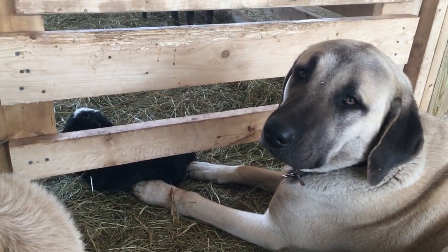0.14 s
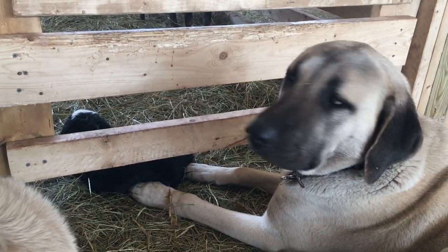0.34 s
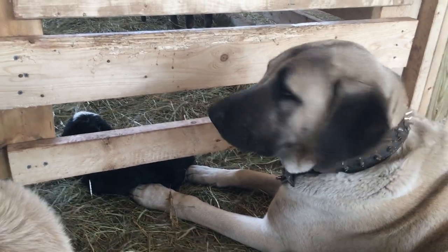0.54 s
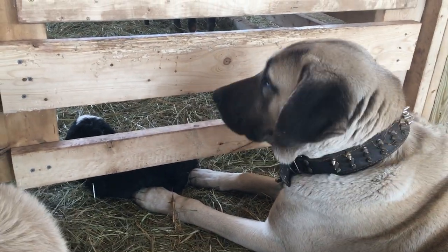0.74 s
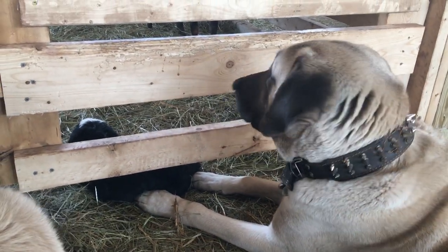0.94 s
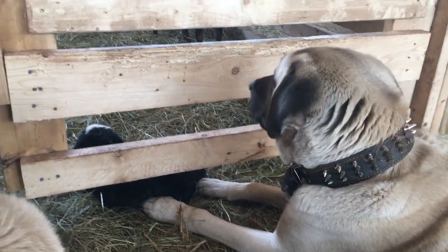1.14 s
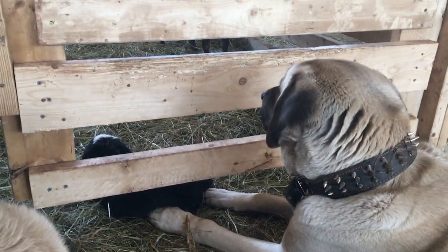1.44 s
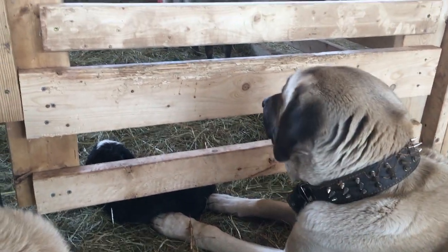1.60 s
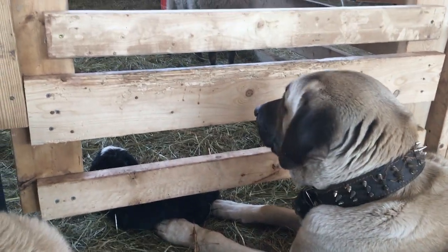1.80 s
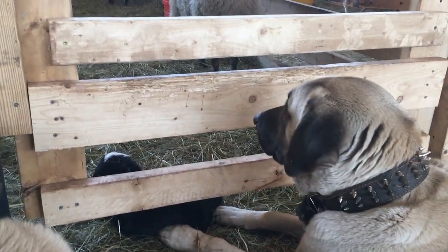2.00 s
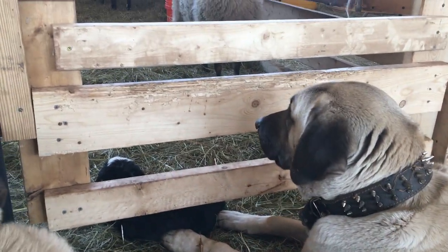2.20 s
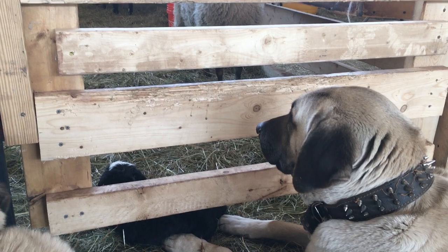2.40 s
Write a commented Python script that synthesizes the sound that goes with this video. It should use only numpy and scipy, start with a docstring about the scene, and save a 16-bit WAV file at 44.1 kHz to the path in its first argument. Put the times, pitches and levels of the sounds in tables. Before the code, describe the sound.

A lamb bleats once in a wooden barn, starting closed-mouthed, opening, then sagging in pitch.

```python
"""A lamb bleats once in a wooden barn, a few metres away: mouth closed, then open, the pitch sagging at the end.
The voice is a stack of overtones and pulsed breath through a changing throat, led in by hiss from the nose.
Near planks answer with dense noise echoes and the barn with a tail that dies at its own speed per frequency.
Boards knock far off as coloured noise bursts, small things tick close by as brief rings, straw rustles
in lumps of noise, and a low rumble with faint hiss fills the air."""
import sys
import numpy as np
from scipy import signal
from scipy.fft import rfft, irfft, next_fast_len
from scipy.io import wavfile
from scipy.ndimage import uniform_filter1d, map_coordinates

SR = 44100
rng = np.random.default_rng(int(sys.argv[2]) if len(sys.argv) > 2 else 0)


def voltage_ratio(level):
    """Linear amplitude factor for a level in decibels (scalar or array-like)."""
    return 10 ** (np.asarray(level, float) / 20)


def generate_wav(signal):
    """Clip the signal to [-1, 1] and save it as 16-bit WAV at the path in sys.argv[1]."""
    frames = np.transpose(np.atleast_2d(signal))
    scaled = np.clip(frames, -1, 1) * 32767
    pcm = np.round(scaled).astype(np.int16)
    wavfile.write(sys.argv[1], SR, pcm)


N = 112454
VOICE_N = SR  # the voice is made in one second

# Colour of the open throat, for overtones and breath. Each row: frequency in Hz, level in dB.
OPEN_THROAT = [(800, -7), (1200, -4), (1650, 0), (2000, -7), (2550, -4), (2820, -10), (3000, -24),
               (3230, -26), (3420, -10), (3600, -7), (4000, -11), (4400, -8), (5000, -15), (5550, -9),
               (6100, -10), (7000, -17), (7700, -26), (9000, -25), (10300, -31), (11700, -28), (12600, -33),
               (13500, -46), (16000, -39)]


def unit(x):
    """Scale to rms 1."""
    return x / np.sqrt(np.mean(x ** 2) + 1e-20)


def along(points, hz):
    """Read (Hz, value) points on a log frequency axis."""
    f, v = np.transpose(points)
    return np.interp(np.log(hz + 1), np.log(f + 1), v)


def level_over_time(points, t):
    """Read (seconds, dB) points over time, at -120 dB outside them."""
    s, db = np.transpose(points)
    return np.interp(t, s, db, left=-120, right=-120)


def wobble(rate, count, size=N):
    """Random curves: straight lines between normal random knots, rate knots a second."""
    knots = rng.standard_normal((count, int(size * rate / SR) + 4))
    place = np.arange(size) * rate / SR
    return np.array([map_coordinates(k, [place], order=1) for k in knots])


def coloured(x, points):
    """Filter x to the (Hz, dB) colour."""
    m = next_fast_len(len(x) + 8192)
    gain = voltage_ratio(along(points, np.fft.rfftfreq(m, 1 / SR)))
    return irfft(rfft(x, m) * gain, m)[:len(x)]


def overtones(t, hz, phase, mouth, low_db, mid_db, treble_db):
    """Vocal folds: a fundamental and flickering overtones, shaped by a throat that goes from closed to open."""
    # Colour of the throat behind a closed mouth. Each row: frequency in Hz, level in dB.
    closed_throat = [(800, -3), (1200, 1.5), (1600, -6), (1900, -4), (2250, -1.5), (2700, -19), (3100, -28),
                     (3800, -13), (4600, 0.5), (5400, -2.5), (6200, -12.5), (7600, -22), (16000, -48)]
    treble_hz = 3030  # the middle overtones end and the treble starts here
    shimmer_db, wander_rad, spread_rad = 3.5, 0.055, 0.16  # flicker, phase wander, pulse smear
    shut_treble_db, voiced_from_s = -7.5, 0.27  # voiced treble held down until this time

    k = np.arange(2, 37)[:, None]
    overtone_hz = k * hz
    throat = voltage_ratio((1 - mouth) * along(closed_throat, overtone_hz) + mouth * along(OPEN_THROAT, overtone_hz))
    flicker = voltage_ratio(shimmer_db * wobble(35, len(k), VOICE_N))
    wander = wander_rad * k * wobble(60, len(k), VOICE_N)
    wave = flicker * np.cos(k * phase + spread_rad * k ** 2 + wander)

    held_down = np.clip((voiced_from_s - t) / 0.03 + 1, 0, 1)
    tone = voltage_ratio(low_db) * np.cos(phase)
    for share, db in ((overtone_hz < treble_hz, mid_db),
                      (overtone_hz >= treble_hz, treble_db + shut_treble_db * held_down)):
        weight = throat * share
        tone = tone + voltage_ratio(db) * (weight * wave).sum(0) / np.sqrt((weight ** 2).sum(0))
    return np.sqrt(2) * tone


def breath(hz, phase, mouth, mid_db):
    """Breath noise pulsed once a cycle through the open throat, stronger while the pitch slides."""
    # Colour of the breath against the voice. Each row: frequency in Hz, level in dB.
    breath_colour = [(300, -36), (600, -37), (2000, -28), (4000, -17), (9000, -20), (16000, -9)]
    rasp_db, rasp_hz_per_s = 10.5, 425  # most breath gained, and the slide speed that gives it
    slide = uniform_filter1d(np.abs(np.gradient(hz)) * SR, SR // 50) / rasp_hz_per_s
    pulsed = rng.standard_normal(VOICE_N) * (1 + 0.7 * np.cos(phase))
    puffs = unit(coloured(pulsed, [(200, -10), *OPEN_THROAT]))
    gain = voltage_ratio(mid_db + rasp_db * np.clip(slide, 0, 1)) * (0.34 + 0.41 * mouth)
    return gain * coloured(puffs, breath_colour)


def nose(t):
    """Air hissing through the nose before the mouth opens: coloured noise with a lumpy level."""
    # The hiss swelling and fading. Each row: time in seconds, level in dB before the voice trim.
    hiss = [(0.08, -82), (0.12, -66.5), (0.188, -59), (0.23, -57.5), (0.32, -65)]
    # Colour of the nose. Each row: frequency in Hz, level in dB per Hz.
    nose_colour = [(2000, -39), (3300, -12), (4200, -25), (4650, -4), (5000, -17), (5350, -5), (5600, -2),
                   (6000, -1), (6500, -7.5), (7200, -12), (11400, -22.5), (12900, -19), (15500, -33)]
    level_db = level_over_time(hiss, t) + 1.6 * wobble(36, 1, VOICE_N)[0]
    return voltage_ratio(level_db) * unit(coloured(rng.standard_normal(VOICE_N), nose_colour))


def lamb():
    """One bleat: vocal folds with a shaky pitch drive overtones and breath, with hiss from the nose."""
    # The course of the bleat. Each row: time in seconds, pitch in Hz, then levels in dB before the
    # voice trims: the fundamental, the middle overtones, the treble.
    bleat = [(0.11, 342.3, -71, -65, -74), (0.13, 367, -73.5, -66, -72), (0.18, 384, -53, -57.5, -57),
             (0.208, 402.7, -47, -57.5, -68), (0.232, 396, -51.5, -57, -56.5), (0.26, 407, -46, -49, -53.5),
             (0.268, 392, -47, -61, -60), (0.282, 384, -60, -49.5, -57.5), (0.3, 364, -77, -55.5, -71),
             (0.326, 371.8, -62, -52, -62.5), (0.412, 383.6, -54.5, -41.5, -47.5),
             (0.438, 392.9, -58, -47.5, -46), (0.458, 393.3, -53.5, -42.5, -47),
             (0.506, 398.4, -57, -37.5, -42.5), (0.528, 401.7, -52.5, -40, -43.5),
             (0.576, 392.7, -61.5, -39, -47.5), (0.6, 394.2, -52.5, -40.5, -44),
             (0.628, 402, -55.5, -36.5, -47), (0.648, 412.7, -61, -41.5, -42.5),
             (0.658, 410.4, -48.5, -40, -41.5), (0.696, 418.0, -65, -39.5, -43),
             (0.72, 426.9, -56.5, -39, -41), (0.746, 425.6, -60, -36.5, -38),
             (0.764, 430.5, -57, -35.5, -41.5), (0.81, 426.5, -47.5, -35.5, -41),
             (0.826, 413.2, -58, -41, -45.5), (0.842, 401, -54.5, -39.5, -43), (0.86, 397, -52, -41, -47.5),
             (0.885, 366, -71, -43.5, -60)]
    shut_until_s, opens_s = 0.36, 0.15  # the mouth opens from here, over this time
    jitter, quaver = 0.0049, 0.0039  # fast and slower pitch shake, as fractions of the pitch
    edge_s, voice_trim_db = 0.011, -2.5

    t = np.arange(VOICE_N) / SR
    s, *columns = np.transpose(bleat)
    hz, low_db, mid_db, treble_db = [np.interp(t, s, c) for c in columns]
    mouth = np.clip((t - shut_until_s) / opens_s, 0, 1)  # 0 closed, 1 open
    shake = jitter * wobble(150, 1, VOICE_N)[0] + quaver * wobble(28.03, 1, VOICE_N)[0]
    phase = 2 * np.pi * np.cumsum(hz * (1 + shake)) / SR
    edge = np.clip(np.minimum(t - s[0], s[-1] - t) / edge_s + 1, 0, 1)
    voiced = overtones(t, hz, phase, mouth, low_db, mid_db, treble_db) + breath(hz, phase, mouth, mid_db)
    return voltage_ratio(voice_trim_db) * np.pad(edge * voiced + nose(t), (0, N - VOICE_N))


def pen(x):
    """The near planks answer first: dense early echoes as a short decaying noise tail."""
    pen_db, pen_t60_s = -4, 0.12
    t = np.arange(SR // 8) / SR
    tail = rng.standard_normal(len(t)) * voltage_ratio(-60 * t / pen_t60_s) * (t > 0.003)
    return voltage_ratio(pen_db) * signal.fftconvolve(x, tail / np.linalg.norm(tail))[:N]


def barn(x):
    """The barn rings on: a delayed noise tail in which each frequency dies at its own speed."""
    # Decay of the barn. Each row: frequency in Hz, time to fall by 60 dB in seconds.
    barn_t60 = [(300, 1.26), (600, 1.15), (900, 1.16), (1500, 0.65), (3000, 0.72), (6000, 0.51),
                (12000, 0.69)]
    delay_s = 0.012
    hz, t, z = signal.stft(rng.standard_normal(SR), SR, nperseg=256)
    decay = voltage_ratio(-60 * t / along(barn_t60, hz)[:, None])
    tail = signal.istft(z * decay, SR, nperseg=256)[1]
    delayed = np.pad(x, (round(delay_s * SR), 0))
    return signal.fftconvolve(delayed, tail / np.linalg.norm(tail))[:N]


def boards():
    """Far knocks: each a short noise burst with the colour of a board; returns dry sound and barn feed."""
    # The knocks. Each row: start in seconds, level in dB before a 2 dB cut and the soft onset,
    # tilt in dB per octave around 1500 Hz, barn feed against the dry sound in dB.
    knocks = [(0.056, -51, -6, -1), (1.351, -65, 8, -1), (1.843, -59, 4.5, -5), (1.9, -65, -3, 18),
              (2.277, -42.5, -0.5, -3.5), (2.317, -45.5, -4, -2), (2.35, -50, -6.5, -1.5)]
    # Colour of a struck board before the tilt. Each row: frequency in Hz, level in dB per Hz.
    board_colour = [(150, -20), (290, -6.5), (450, -7), (800, -4.5), (1400, 1.5), (2400, -2.5),
                    (3000, -7.5), (6000, -16.5), (9000, -28), (16000, -47)]
    knock_t60_s, rise_s = 0.11, 0.005
    out, t = np.zeros((2, N + SR)), np.arange(SR // 8) / SR
    for s, db, tilt_db, wet_db in knocks:
        colour = [(hz, level + tilt_db * np.log2(hz / 1500)) for hz, level in board_colour]
        burst = unit(coloured(rng.standard_normal(len(t)), colour))
        burst = burst * voltage_ratio(db - 2 - 60 * t / knock_t60_s) * (1 - np.exp(-t / rise_s))
        out[:, round(s * SR):][:, :len(t)] += burst * voltage_ratio([[0], [wet_db]])
    return out[:, :N]


def ticks():
    """Small close taps and ticks: a brief ring with a faint noise crack scaled to its pitch."""
    # The ticks. Each row: start in seconds, level in dB before the soft onset, pitch in Hz,
    # time to fall by 60 dB in seconds.
    tick_list = [(.055, -51.5, 1314, 0.039), (.092, -60.5, 1028, 0.13), (1.052, -49, 1440, 0.086),
                 (1.0682, -52, 12740, 0.038), (1.0697, -51, 15350, 0.033), (1.0736, -56, 15400, 0.017),
                 (1.2168, -50, 7640, 0.011), (2.281, -48, 300, 0.079)]
    rise_s = 0.0008
    out, t = np.zeros(N + SR), np.arange(SR // 10) / SR
    for s, db, hz, t60 in tick_list:
        crack = np.diff(rng.standard_normal(len(t) + 2), 2) * hz / 15000  # differencing makes it bright
        envelope = voltage_ratio(db - 60 * t / t60) * (1 - np.exp(-t / rise_s))
        out[round(s * SR):][:len(t)] += envelope * (np.sin(2 * np.pi * hz * t) + 0.18 * crack)
    return out[:N]


def straw():
    """Straw shifting: coloured noise whose level jumps about in lumps."""
    # The rustle. Each row: time in seconds, level in dB before a 0.5 dB lift and the lumps.
    rustle = [(1.2, -77), (1.34, -77), (1.45, -74.5), (1.56, -89), (1.74, -82), (1.78, -75.5), (1.83, -81),
              (1.9, -71), (2, -100.5), (2.14, -81), (2.27, -79), (2.35, -92)]
    # Colour of straw. Each row: frequency in Hz, level in dB per Hz.
    straw_colour = [(300, -20), (700, 0), (2000, -4), (4000, -10), (8000, -18), (16000, -30)]
    level_db = level_over_time(rustle, np.arange(N) / SR) + 0.5 + 2.97 * wobble(45, 1)[0]
    return voltage_ratio(level_db) * unit(coloured(rng.standard_normal(N), straw_colour))


def air():
    """Steady rumble and faint hiss: coloured noise whose level sways slightly."""
    # Colour of the air. Each row: frequency in Hz, level in dB per Hz.
    air_colour = [(13, -40), (25, -40), (40, -5), (60, 0.5), (85, -0.5), (110, -5.5), (170, -10),
                  (300, -17), (450, -22.5), (700, -27), (1200, -35), (2500, -37), (5000, -42),
                  (9000, -41.5), (10400, -45), (12000, -42), (16000, -49)]
    level_db = -56.5 + 0.6 * wobble(3, 1)[0]
    return voltage_ratio(level_db) * unit(coloured(rng.standard_normal(N), air_colour))


def scene():
    """Lamb and boards in the barn, with ticks, straw and air dry."""
    barn_db = -5  # how much of the voice feeds the barn
    voice = lamb()
    wood, wood_feed = boards()
    room = pen(voice) + barn(voltage_ratio(barn_db) * voice + wood_feed)
    return (voice + room + wood + ticks() + straw() + air())[None]


def top_cut(x):
    """Nothing passes above the cut-off."""
    return signal.sosfilt(signal.butter(12, 16370, fs=SR, output="sos"), x)


def record(dry):
    """Hand on the finished mix."""
    return top_cut(dry)


dry = scene()
out = record(dry)
generate_wav(out)
```